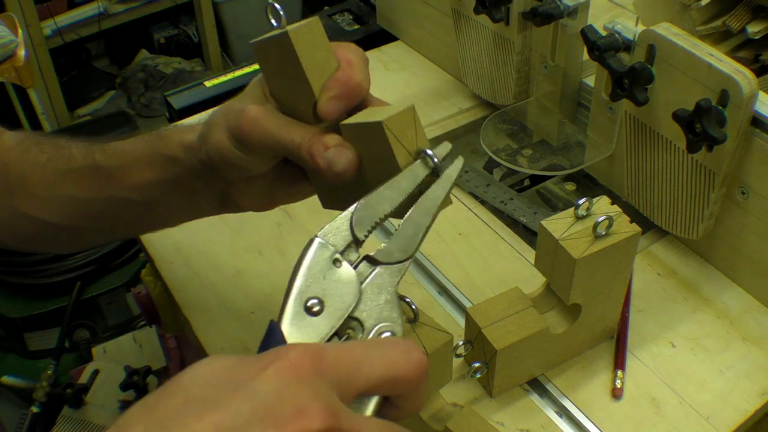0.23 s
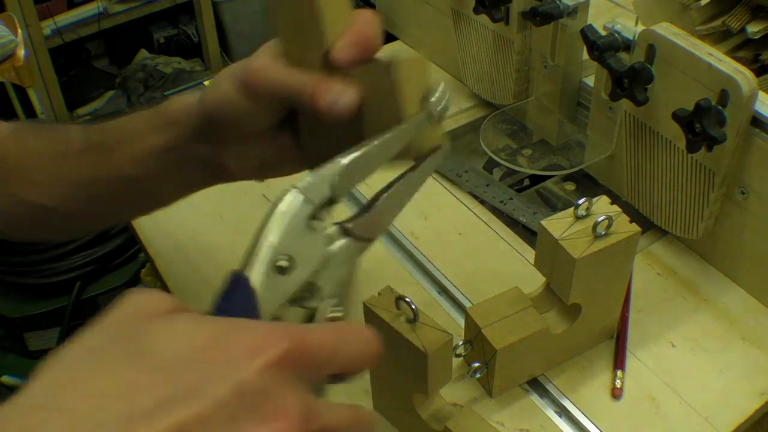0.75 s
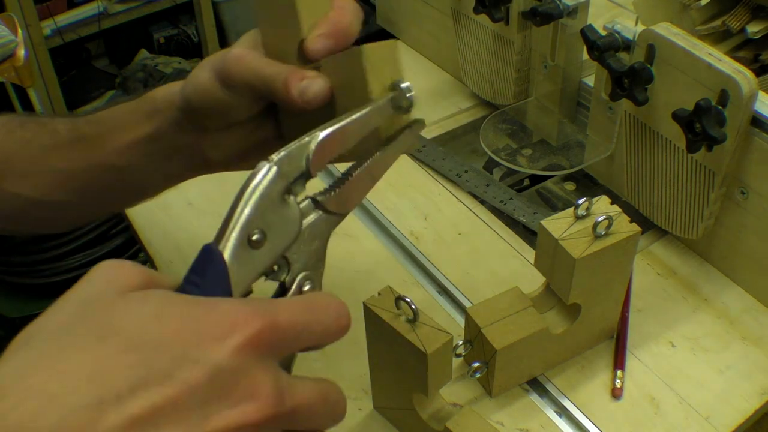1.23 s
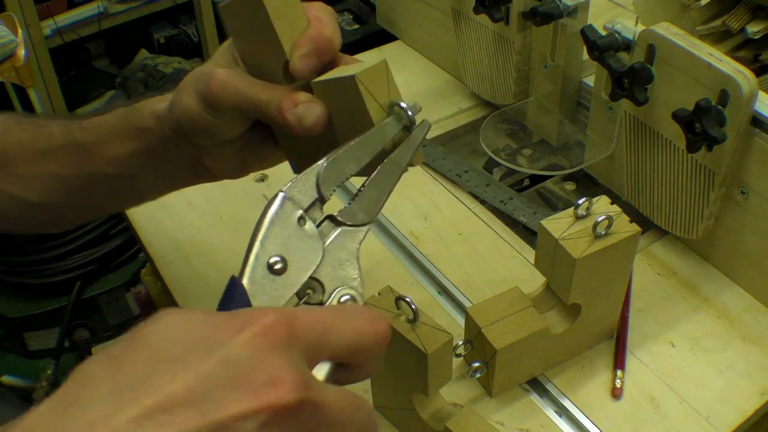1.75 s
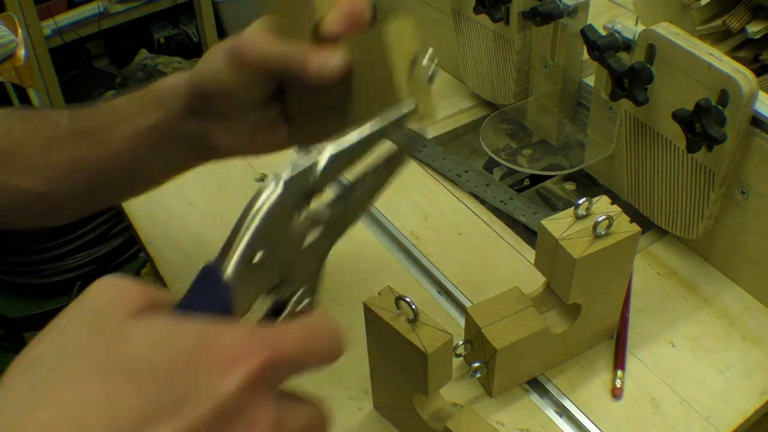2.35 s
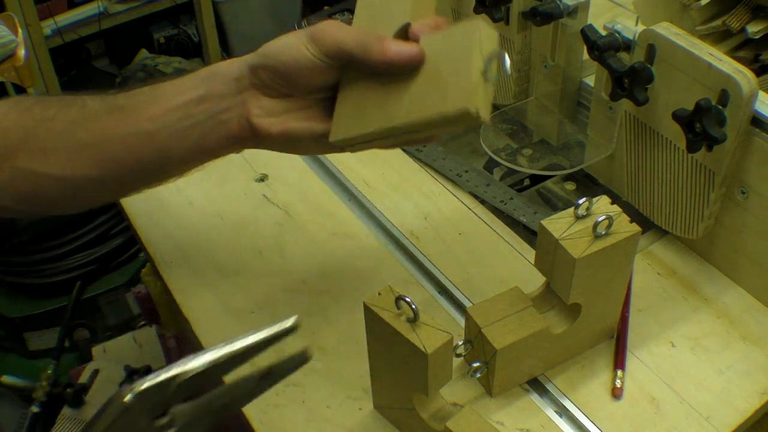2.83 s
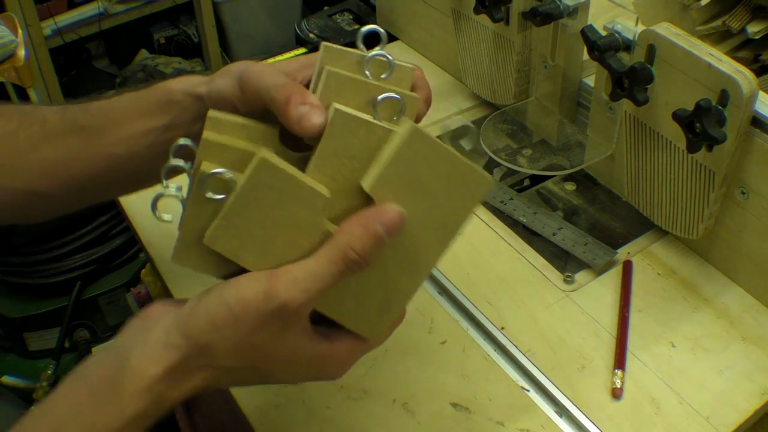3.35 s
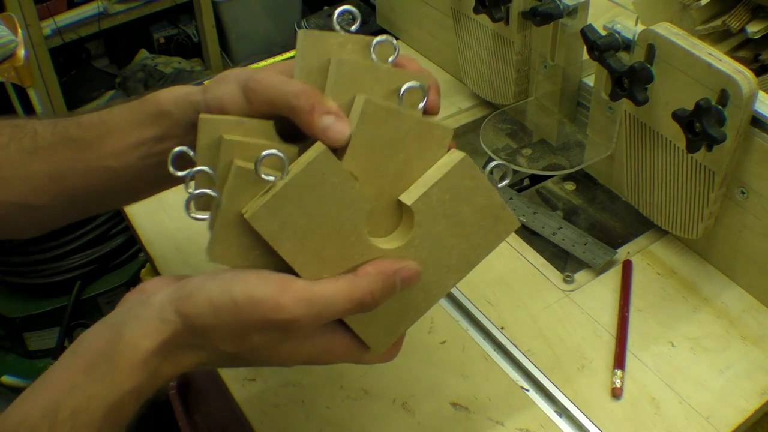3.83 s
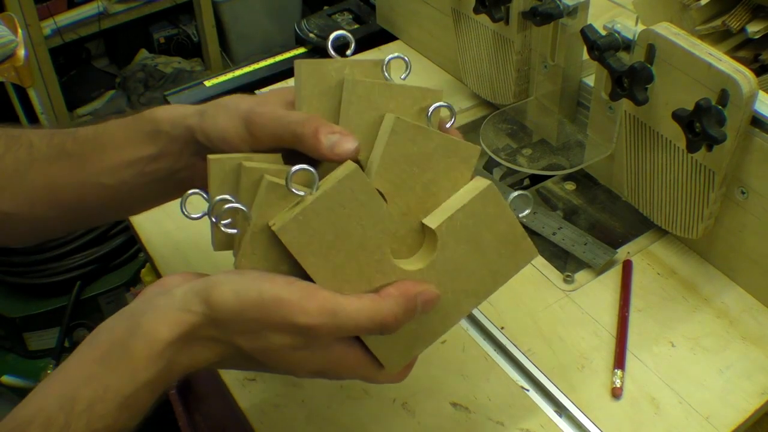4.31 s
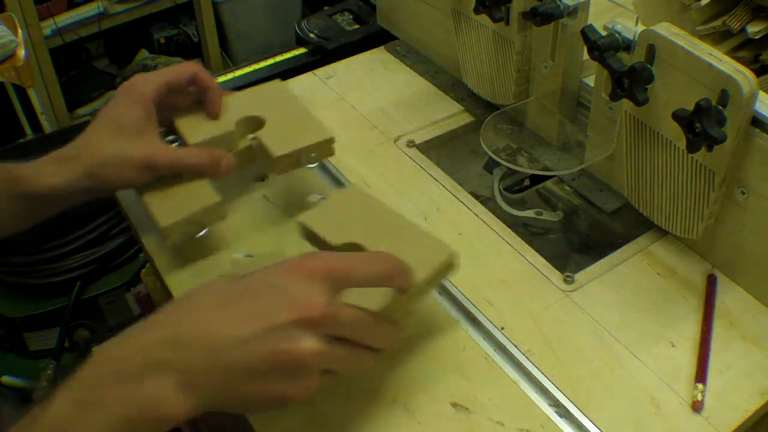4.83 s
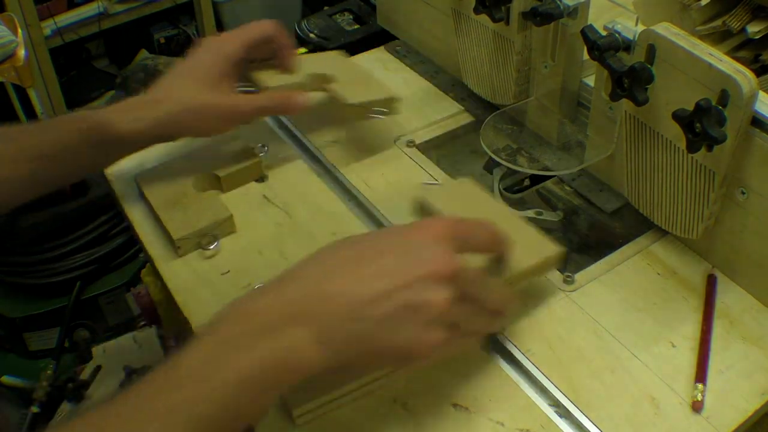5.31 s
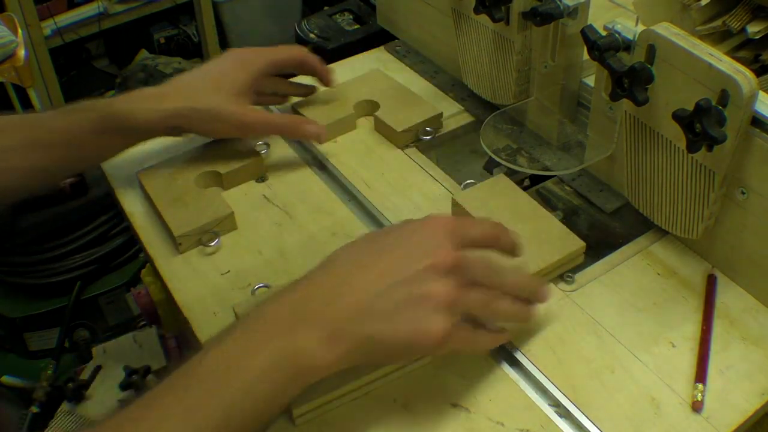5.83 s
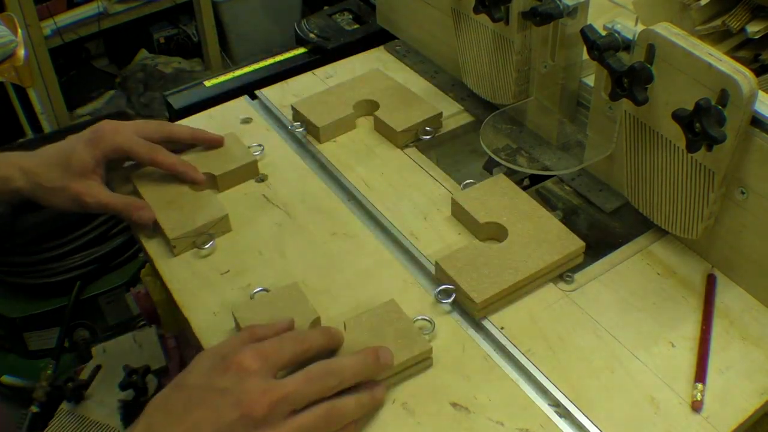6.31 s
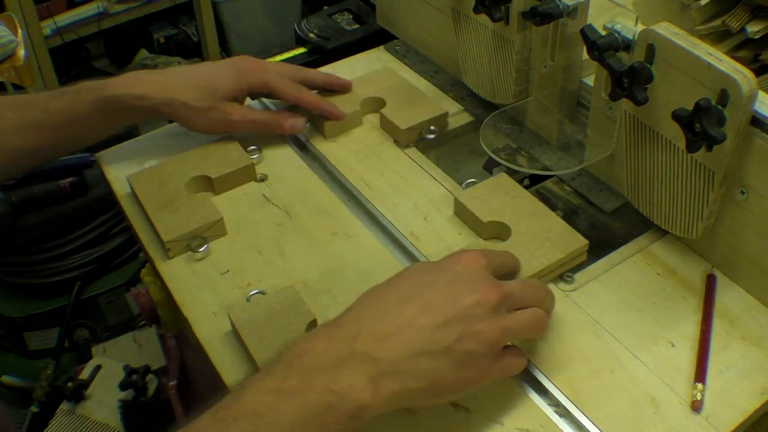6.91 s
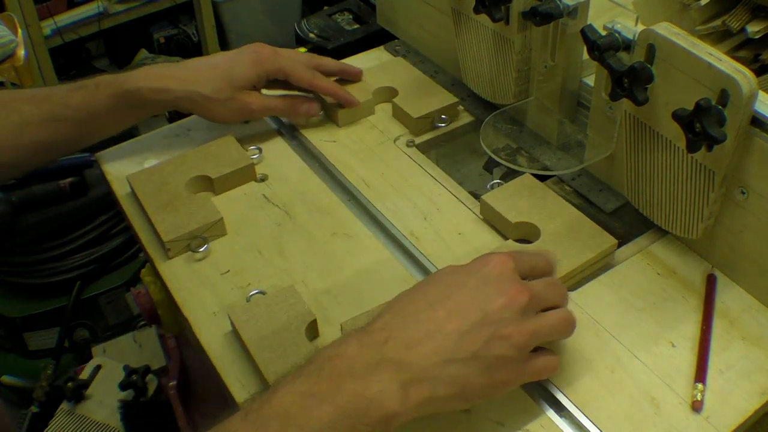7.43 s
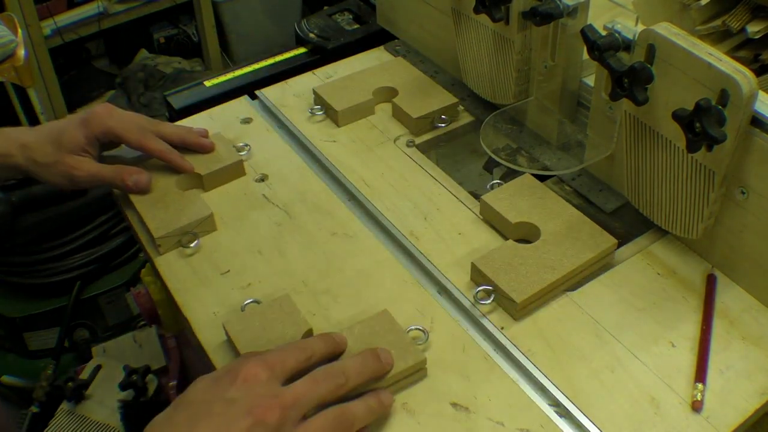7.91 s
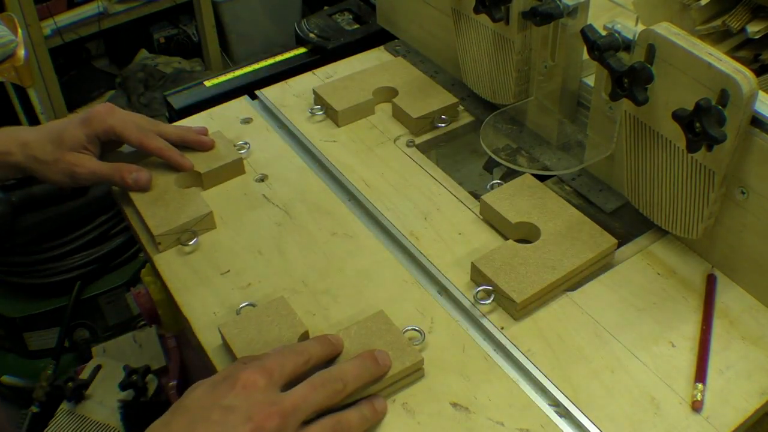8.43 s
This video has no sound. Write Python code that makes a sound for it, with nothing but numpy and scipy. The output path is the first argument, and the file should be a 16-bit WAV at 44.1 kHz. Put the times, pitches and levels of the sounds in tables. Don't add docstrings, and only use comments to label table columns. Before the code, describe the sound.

Three short groups of metallic clicks and scrapes come from steel jaws slipping on a screw eye. After a pause, fibreboard faces shuffle drily in the hands. A stack clatters very loudly onto a wooden table in two bursts, the last crack sharpest and ringing the hollow frame. Gentle pushes and fingertip nudges follow. Close microphone, dry room, low background hum.

```python
import sys
import numpy as np
from scipy import signal
from scipy.fft import rfft, irfft, next_fast_len
from scipy.io import wavfile
from scipy.ndimage import uniform_filter1d

SR = 44100
rng = np.random.default_rng(int(sys.argv[2]) if len(sys.argv) > 2 else 0)


def inscribe(sig):
    pcm = np.round(np.clip(np.atleast_2d(sig).T, -1, 1) * 32767)
    wavfile.write(sys.argv[1], SR, pcm.astype(np.int16))


def convert_level_to_amplitude(level_db):
    exponent = np.asarray(level_db, float) / 20
    return 10 ** exponent


N = 382126

# frequency in Hz, density in dB per Hz.
AIR_COLOUR = [(12, -53.5), (20, -27), (55, -4), (123, -8.5), (204, -7.5), (228, -16), (293, -20),
              (399, -7.5), (759, -24), (1860, -27.5), (2140, -27), (3070, -28), (3630, -29), (16000, -37.5)]
# frequency in Hz, level in dB rms.
HUM_LINES = [(100, -76), (200, -71), (300, -77), (400, -77.5), (2200, -84), (11100, -94)]
# frequency in Hz, density in dB per Hz.
PREAMP_COLOUR = [(18, -49.5), (30, -22), (157, -9), (252, -12.5), (384, -5), (1010, -12), (2170, -13),
                 (13700, -15.5), (16000, -22)]
# frequency in Hz, T60 in seconds.
ROOM_T60 = [(200, 0.31), (800, 0.18), (3000, 0.22), (7000, 0.03), (14000, 0.047)]

# time in seconds, peak in dB, seat of the held block (how well it is
# driven) in dB, top modes in dB relative.
PLIER_BITES = [(0.5671, -36, -26, -16), (0.64, -49.5, -22, -4), (0.6942, -36.5, -12, -2),
               (0.7154, -34, -8.5, -2), (0.7884, -32.5, -23, 1), (1.2113, -28, -3.5, 12),
               (1.2154, -39, -3, 6.5), (1.2531, -18, -39, -5.5), (1.2584, -22.5, -24, -18),
               (1.3039, -35, 2, -6), (1.3208, -15, -11, 6), (1.3281, -30, -28, 8), (1.3314, -19, -30, 5),
               (1.3424, -34, -14.5, -4), (1.3574, -29.5, -28.5, 5), (1.4042, -33, -23, -1),
               (1.4628, -44, -20.5, 1), (2.161, -52, -4.5, -20.5), (2.2089, -49.5, -15, -11),
               (2.3044, -42, -2, 10), (2.3136, -27, -1, 5), (2.3174, -18.5, -56, -19),
               (2.3274, -25, -18, 5), (2.3324, -19.5, -29, -4), (2.3524, -43, -23, -6),
               (2.3614, -36.5, -36, 3), (2.3754, -43, -32, -10), (2.3874, -37.5, -37, 0),
               (2.4104, -41, -15.5, 2.5), (2.5411, -42.5, -36.5, -14)]
# time in seconds, peak in dB.
TOOTH_SKIPS = [
    (.7228, -27),
    (.7324, -33),
    (.7398, -22),
    (.7474, -27),
    (.7565, -25),
    (.764, -18),
    (.7724, -18),
    (.7796, -26),
]
# hardest moment in seconds, level in dB, rise in seconds over 20 dB,
# fall in seconds over 20 dB, brightness in dB.
JAW_GRINDS = [
    (.83, -58, .1, .13, -14),
    (.752, -37.5, .05, .07, -2),
    (1.215, -48, .02, .05, 5),
    (1.27, -45, .03, .05, -13),
    (1.306, -40, .012, .045, 4),
    (1.37, -57, .05, .07, 9),
    (2.19, -71, .1, .4, -5),
    (2.32, -41, .03, .04, 3),
    (2.37, -56, .05, .08, 3),
]
# frequency in Hz, level in dB, T60 in seconds.
LOW_JAW_MODES = [(1567, -15, 0.02), (1860, -2.5, 0.0082), (2227, 1, 0.025), (2395, -2, 0.017)]
# frequency in Hz, level in dB, T60 in seconds.
JAW_MODES = [(2950, -12, 0.013), (2860, 5.5, 0.014), (3362, 13.5, 0.017), (3770, -9.5, 0.0048),
             (4400, 1, .007)]
# frequency in Hz, level in dB, T60 in seconds.
TOP_JAW_MODES = [(5050, 1, 0.015), (5320, 0, 0.0086), (6100, -6.5, 0.0062), (6830, -1, 0.0051),
                 (7775, -5, 0.0048), (8056, -3.5, 0.012), (9300, -0.5, 0.003), (10340, -9, 0.0051),
                 (11800, -13.5, 0.0038), (12100, -19.5, .003), (13900, -11, .004), (15000, -11, 0.0033)]
# frequency in Hz, level in dB, T60 in seconds.
HELD_BLOCK_MODES = [(109.5, -22, .025), (444, -1, 0.037), (635, -1.5, 0.045), (790, -1, 0.012),
                    (994, -1.5, 0.019)]
# frequency in Hz, density in dB per Hz.
GRIND_SPECTRUM = [(590, -62.5), (1000, -21.5), (1340, -27), (1520, -2), (1810, -13), (3420, -3),
                  (3840, -12), (8260, -18), (16000, -29)]
# time in seconds, frequency in Hz, peak in dB, T60 in seconds.
FREE_PINGS = [(.568, 5200, -45, .03), (.698, 1560, -37, .07), (.773, 2200, -26, .05),
              (1.212, 3420, -36, .08), (1.322, 13780, -44, .22), (.7225, 4900, -34, .03),
              (.7565, 3450, -28, .05), (2.306, 13800, -50, .05), (2.315, 2190, -29, .08),
              (2.329, 3400, -33, .08), (2.389, 4958, -49, .17), (.74, 5150, -32, .02),
              (.7645, 5000, -27, .02), (.7728, 4900, -28, .025), (.81, 3400, -43, .05),
              (.828, 3150, -45, .04), (.86, 3250, -51, .05), (.745, 1620, -33, .04), (.757, 2250, -31, .03),
              (.80, 1600, -45, .1), (2.305, 4950, -44, .03), (2.35, 3350, -45, .1), (2.41, 3050, -50, .14)]
# time in seconds,
# frequency in Hz, peak in dB, T60 in seconds.
CLICK_RINGS = [(.7395, 4300, -32, .02), (.7395, 700, -36, .03), (.7645, 4200, -26, .015),
               (.7645, 600, -33, .03), (.7728, 4250, -27, .02), (.7728, 600, -35, .03),
               (.788, 5700, -34, .015), (1.2113, 13900, -34, .01), (1.2155, 13900, -38, .01),
               (1.253, 6200, -30, .01), (1.3208, 13800, -24, .012), (1.3295, 8300, -26, .015),
               (1.3295, 10800, -30, .012), (1.3295, 6800, -28, .015), (1.823, 2200, -52, .03),
               (2.306, 4950, -38, .03), (2.3145, 7000, -33, .02), (2.3145, 5000, -33, .02),
               (2.3275, 7000, -33, .015), (2.352, 7800, -44, .012), (2.387, 10000, -46, .01),
               (2.592, 2250, -54, .05), (2.592, 700, -45, .07), (1.212, 700, -38, .04)]

HAND_RUBS = [(2.986, -46, 0.0073, 0.031, -17), (3.08, -51.5, 0.046, 0.018, -7),
             (3.165, -38.5, 0.069, 0.087, -12), (3.352, -48.5, 0.047, 0.17, -3.5),
             (3.512, -44.5, 0.056, 0.023, -3), (3.26, -42, .03, 0.0076, -4.5),
             (3.58, -53, 0.034, 0.22, -1.8), (3.77, -50.5, 0.041, 0.09, 3), (3.86, -47.5, .02, .075, -6),
             (4.0, -65, 0.054, 0.18, -16), (4.16, -56, 0.036, 0.15, -4), (4.68, -66.5, 0.051, 0.051, 8.5)]
STACK_SKIDS = [
    (5.01, -39.5, 0.016, 0.024, -11.5),
    (5.11, -57.5, 0.18, 0.0092, -5),
    (5.465, -53.5, 0.042, 0.061, -9),
    (5.59, -42, 0.028, 0.033, 2.5),
    (5.64, -52, .01, 0.1, -16),
]
BLOCK_ROCKS = [
    (5.036, -42, 0.028, 0.11, -17.5),
    (4.988, -53, 0.0058, 0.026, 8),
    (5.465, -45, .012, 0.05, -10),
    (5.598, -39.5, 0.063, 0.015, 5),
    (5.615, -20, 0.0015, 0.0028, -0.5),
    (5.625, -26.5, .002, 0.028, -2.5),
    (5.657, -25.5, .01, 0.14, -31),
    (5.803, -57.5, 0.012, 0.21, -16),
]
TABLE_SLIDES = [
    (6.114, -58.5, 0.15, 0.095, -4.5),
    (6.302, -50.5, 0.074, 0.074, 1.5),
    (6.385, -49.5, 0.022, 0.045, -2),
    (6.846, -47, 0.045, 0.028, -6.5),
    (6.938, -44.5, 0.11, 0.072, -5.5),
    (7.0, -48, .02, 0.19, 6.5),
    (7.204, -48.5, 0.019, 0.135, -3),
    (7.32, -55.5, 0.018, 0.19, -19.5),
    (7.85, -42, 0.046, 0.081, -4.5),
    (7.925, -42, .02, 0.1, -25.5),
]
FINGER_NUDGES = [
    (0.0, -58.5, .01, 0.046, -20),
    (8.11, -56.5, 0.09, 0.0067, -4),
    (8.21, -56.5, 0.033, 0.014, -6),
    (8.285, -57.5, 0.057, 0.039, 0),
    (8.352, -52.5, 0.031, 0.055, -11.5),
    (8.505, -50.5, .04, 0.0098, -7.5),
    (8.56, -51, 0.032, 0.017, -8),
    (8.615, -39.5, 0.036, 0.028, -11.5),
]
# frequency in Hz, density in dB per Hz.
FACE_SPECTRUM = [(180, -45), (300, -32), (348, -23.5), (624, -20.5), (1190, -19.5), (1750, -8.5),
                 (2280, -8.5), (2520, -18.5), (3000, -12), (3320, 0), (3800, -12), (4520, -21), (5430, -13),
                 (7690, -17), (8360, -17), (13800, -21.5), (16000, -23.5)]
# frequency in Hz, density in dB per Hz.
TABLE_SPECTRUM = [(29, -55), (50, -21), (155, -23.5), (200, -12), (270, -16), (367, -8.5), (405, -2),
                  (540, -7.5), (669, -17.5), (717, -16.5), (1400, -26.5), (1820, -53.5), (3080, -120)]
# frequency in Hz, density in dB per Hz.
SURFACE_SPECTRUM = [(710, -26), (1200, -13), (1520, -3.5), (1850, -11.5), (2200, -4), (2530, -11.5),
                    (3250, -2), (4040, -15.5), (10000, -23), (16000, -31)]

# time in seconds, peak in dB, low modes in dB relative, sharpness in dB
# relative, contact in milliseconds.
BLOCK_KNOCKS = [(.001, -41, -22, -24, 0.72), (0.9595, -46, -8, -22.5, 1.3), (1.737, -48.5, 10.5, -15, .4),
                (1.823, -41, 8, -13.5, .25), (2.271, -47, 14, -12, .4), (2.592, -36.5, -8, -14, 0.67),
                (3.11, -31, 5.5, -18, 0.45), (5.005, -8, -1.5, -15, 0.56), (5.009, -14, 4.5, -23.5, 0.81),
                (5.013, -3.5, -4, -15, 0.39), (5.0165, -13.5, -5.5, -18.5, 0.37),
                (5.021, -8.5, -9.5, -15.5, 0.53), (5.023, -11, -7.5, -14, 0.22),
                (5.026, 0, -6.5, -21.5, 0.89), (5.031, -9.5, -9.5, -10.5, .35),
                (5.037, -17.5, -0.5, -14, .6), (5.046, -22.5, 3, -22.5, 0.87),
                (5.065, -22.5, 0.5, -23.5, .6), (5.434, -8.5, 4.5, -25.5, 0.84),
                (5.4604, -4.5, -5, -22, .75), (5.482, -13, 2, -21.5, 0.64), (5.491, -11, 0, -20.5, .9),
                (5.499, -16, 10.5, -24.5, 0.72), (5.5581, -8.5, -3.5, -25, 0.59),
                (5.5626, -9.5, -0.5, -29, 0.44), (5.6083, 0, -2, 2, 0.34), (5.611, -4, -4.5, -9, 0.29),
                (5.649, -7.5, -10, -5, 0.45), (5.663, -11, -9, -10, 0.43), (5.673, -14.5, -14, -23, .5),
                (5.954, -39, -1, -23, 0.54), (7.84, -53, 18, -16, .6), (8.112, -48.5, 15, -19, .7),
                (8.347, -52, 8, -20, 0.64), (8.556, -50, -1, -15, 0.62), (8.612, -38, 14, -12.5, 0.75),
                (3.44, -47, 3, -20, .8), (4.72, -59.5, 2, -10.5, 0.7)]
# time in seconds, peak in dB.
CORNER_CRACKS = [
    (1.823, -55),
    (2.592, -56.5),
    (5.013, -38),
    (5.031, -27.5),
    (5.434, -44.5),
    (5.46, -33),
    (5.558, -34),
    (5.609, -7.5),
    (5.6108, -15),
    (5.65, -37.5),
]
# time in seconds, peak in dB, contact in milliseconds.
FRAME_BLOWS = [
    (5.026, -40, 1.0),
    (5.46, -36, 1.0),
    (5.61, -20, 1.0),
]
# frequency in Hz, level in dB, T60 in seconds.
LOW_BOARD_MODES = [(200, -21, 0.049), (260, -10.5, 0.051), (400, -11, 0.037), (500, 3, 0.043),
                   (570, -13, 0.028), (660, -9, 0.076)]
# frequency in Hz, level in dB, T60 in seconds.
MID_BOARD_MODES = [(754, -5.5, 0.013), (843, 4, 0.015), (949, -7, 0.04), (1056, -8.5, 0.027),
                   (1265, -6.5, 0.023), (1420, -18.5, 0.016), (1450, -6.5, 0.026), (1700, -11.5, 0.019),
                   (1931, -2, 0.0075), (2040, -7, 0.02)]
# frequency in Hz, level in dB, T60 in seconds.
EDGE_MODES = [(2520, -12.5, 0.0043), (2900, -2, 0.0078), (3200, 7, 0.009), (3490, -8, 0.015),
              (3624, -5.5, 0.0067), (4200, -4, 0.006)]
# frequency in Hz, level in dB, T60 in seconds.
TOP_BOARD_MODES = [(4830, -11.5, .008), (5460, -5, 0.0031), (6230, 5.5, 0.0099), (7604, -8, 0.005),
                   (8800, -4.5, 0.0037), (9300, -11, 0.0028), (11100, -6.5, 0.0023), (12100, -1, 0.003),
                   (14300, -15.5, .002)]
# frequency in Hz, level in dB, T60 in seconds.
FRAME_MODES = [(91.5, -11, 1.3), (125, 2, .2), (221, -6, 1.1), (258, -19, 1.0), (296, -24, 1.2),
               (398, 0, 1.3), (452, 12, 0.45), (506, -17, .9), (571, -28, 1.2)]
# time in seconds, frequency in Hz,
# peak in dB, T60 in seconds.
LANDING_RINGS = [(5.013, 92, -33.5, .14), (5.013, 135, -32, .1), (5.013, 1010, -17, .05),
                 (5.013, 1320, -21, .05), (5.017, 1780, -22.5, .04), (5.022, 2200, -21.5, .03),
                 (5.026, 1520, -23.5, .05), (5.032, 900, -20.5, .12), (5.032, 2050, -26.5, .04),
                 (5.05, 400, -27.5, .3), (5.078, 880, -33, .15), (5.434, 1570, -26.5, .04),
                 (5.434, 485, -13, .06), (5.434, 1050, -24, .03), (5.46, 1314, -27.5, .04),
                 (5.46, 780, -14, .03), (5.497, 500, -17, .04), (5.46, 190, -30, .25),
                 (5.558, 1319, -13, .028), (5.558, 894, -18, .05), (5.024, 545, -12, .035),
                 (5.031, 2650, -22, .02), (5.03, 4300, -30, .02), (5.482, 820, -20, .025),
                 (5.62, 3600, -26, .15), (5.65, 1240, -18, .03), (5.558, 1090, -24, .04),
                 (5.609, 2121, -11, .025), (5.609, 1631, -15, .07), (5.609, 1240, -20, .04),
                 (5.609, 985, -18, .1), (5.612, 436, -17.5, .12), (5.65, 1244, -20.5, .05),
                 (5.65, 1940, -22, .035), (5.65, 1490, -25.5, .12), (5.672, 420, -21, .07)]


def log_hz(points, hz):
    table_hz, value = np.transpose(points)
    return np.interp(np.log(hz + 1), np.log(table_hz), value)


def rms_one(x):
    return x / np.sqrt(np.mean(x ** 2) + 1e-20)


def band(x, low_hz, high_hz):
    edges = [low_hz, min(high_hz, 20000)]
    return signal.sosfilt(signal.butter(3, edges, "band", fs=SR, output="sos"), x)


def drift(rate):
    pole = np.exp(-16 * np.pi * rate / SR)
    chance = rng.standard_normal(N // 8 + 5002)
    slow = signal.lfilter([1], [1, -2 * pole, pole * pole], chance)[5000:]
    return np.interp(np.arange(N) / 8, np.arange(len(slow)), rms_one(slow))


def friction(spectrum, grain_db, flutter_db):
    catches = rng.standard_normal(N) * convert_level_to_amplitude(grain_db * drift(870))
    size = next_fast_len(N)
    hz = np.arange(size // 2 + 1) * SR / size
    body = irfft(rfft(catches, size) * convert_level_to_amplitude(log_hz(spectrum, hz)), size)[:N]
    return rms_one(body * convert_level_to_amplitude(flutter_db * drift(18)))


def strokes(rows):
    release_s = 0.039
    out = np.zeros(N)
    for s, db, rise_s, hold_s, change_db in rows:
        knots = np.cumsum([s - 3 * rise_s, 3 * rise_s, hold_s, 3 * release_s])
        at = np.arange(max(round(knots[0] * SR), 0), min(round(knots[-1] * SR), N))
        level = np.interp(at / SR, knots, [db - 60, db, db + change_db, db + change_db - 60])
        out[at] = np.maximum(out[at], convert_level_to_amplitude(level))
    return out


def strike(times, peaks_db, modes, contact_s, spread_db, shift=0.027, length=3000):
    t = np.arange(length) / SR
    hz, level_db, t60 = np.transpose(modes)[:, :, None]
    force = t[:600] / contact_s * np.exp(-t[:600] / contact_s)
    out = np.zeros(N + length)
    for s, peak_db in zip(times, peaks_db):
        detune = 1 + shift * rng.standard_normal(hz.shape)
        free = convert_level_to_amplitude(-60 * t / t60) * np.sin(2 * np.pi * hz * detune * t)
        ragged = rng.standard_normal((len(hz), 600)) * force
        ringing = signal.fftconvolve(free, ragged, axes=1)[:, :length]
        strength = convert_level_to_amplitude(level_db + spread_db * rng.standard_normal(hz.shape))
        ringing *= strength / np.abs(ringing).max(axis=1, keepdims=True)
        blow = band(ringing.sum(axis=0), 0.56 * hz.min(), 1.2 * hz.max())
        at = round(s * SR)
        out[at:at + length] += convert_level_to_amplitude(peak_db) * blow / np.abs(blow).max()
    return out[:N]


def thud(s, peak_db, contact_ms, modes, spread_db, shift, cut_hz, length):
    t = np.arange(length) / SR
    hz, level_db, t60 = np.transpose(modes)[:, :, None]
    chance = rng.standard_normal((2, len(hz), 1))
    decay = convert_level_to_amplitude(level_db + spread_db * chance[0] - 60 * t / t60)
    free = decay * np.sin(2 * np.pi * hz * (1 + shift * chance[1]) * t)
    push = np.sin(np.pi * np.minimum(t[:200] * 1000 / contact_ms, 1)) ** 2
    blow = np.convolve(free.sum(axis=0), push)[:length]
    blow = signal.lfilter(*signal.butter(2, cut_hz, "high", fs=SR), blow)
    out = np.zeros(N + length)
    at = round(s * SR)
    out[at:at + length] = convert_level_to_amplitude(peak_db) * blow / np.abs(blow).max()
    return out[:N]


def rings(rows):
    out, t = np.zeros(N), np.arange(SR // 2) / SR
    for s, hz, peak_db, t60 in rows:
        at = round(s * SR)
        onset = np.minimum(2 * hz * t, 1)
        out[at:at + len(t)] += convert_level_to_amplitude(peak_db - 60 * t / t60) * np.sin(2 * np.pi * hz * t) * onset
    return out


def background():
    t = np.arange(N) / SR
    hum = np.zeros(N)
    for hz, db in HUM_LINES:
        level = convert_level_to_amplitude(db + 1.0 + 2.7 * drift(1.6))
        hum += level * np.sin(2 * np.pi * hz * t + 0.5 * drift(4.0))
    return convert_level_to_amplitude(-67) * friction(AIR_COLOUR, 0, 0.35) + hum


def gain_control(x, knee_db, share, release_db_s):
    ramp = release_db_s * np.arange(N) / SR
    over = share * np.maximum(20 * np.log10(np.abs(x) + 1e-9) - knee_db, 0)
    reduction_db = np.maximum.accumulate(over + ramp) - ramp
    return convert_level_to_amplitude(-uniform_filter1d(reduction_db, size=441))


def shop(x):
    t = np.arange(SR // 2) / SR
    edges = 90 * 2. ** np.arange(9).clip(0, 7.5)
    tail = 0
    for low, high in zip(edges, edges[1:]):
        octave = signal.butter(2, [low, high], "band", fs=SR, output="sos")
        noise = signal.sosfilt(octave, rng.standard_normal(len(t)))
        tail = tail + noise * convert_level_to_amplitude(-60 * t / log_hz(ROOM_T60, np.sqrt(low * high)))
    tail = tail * (1 - np.exp(-t / 0.00067))
    return signal.fftconvolve(x, tail / np.sqrt(np.sum(tail ** 2)))[:N]


def eye():
    song = rings([(1.353, 4947, -37, .3)])
    touch_s, touch_db = 1.377, -9
    return song * np.where(np.arange(N) > touch_s * SR, convert_level_to_amplitude(touch_db), 1)


def jaw_grind():
    middle = strokes([(s, db, rise, fall, -20) for s, db, rise, fall, _ in JAW_GRINDS])
    bright = strokes([(s, db + top_db, rise, 1.2 * fall, -20) for s, db, rise, fall, top_db in JAW_GRINDS])
    grind = friction(GRIND_SPECTRUM, 1.4, 2.3)
    low_part = signal.sosfilt(signal.butter(4, 4500, fs=SR, output="sos"), grind)
    high_part = signal.sosfilt(signal.butter(4, 4500, "high", fs=SR, output="sos"), grind)
    return middle * rms_one(low_part) + bright * rms_one(high_part)


def pliers():
    seat_db, seat_loss_db_s, skip_top_db = -11, 116.5, 2.5
    first_s = TOOTH_SKIPS[0][0]
    skip = [(s, db, seat_db - seat_loss_db_s * (s - first_s), skip_top_db) for s, db in TOOTH_SKIPS]
    s, peak, body, top = np.vstack([PLIER_BITES, skip]).T
    lower = 0.5 + 0.455 * body
    bites = strike(s, peak, JAW_MODES, 0.00046, 7.2, shift=0.05, length=1000)
    bites += strike(s, peak + lower, LOW_JAW_MODES, 0.00079, 5.4, length=1000)
    bites += strike(s, peak + body, HELD_BLOCK_MODES, 0.00021, 0.98, length=1500)
    bites += strike(s, peak + top, TOP_JAW_MODES, 0.00061, 3.2, length=1000)
    for at_s, hz, peak_db, t60 in FREE_PINGS:
        bites += strike([at_s], [peak_db], [(hz, 0, t60)], 0.0003, 0, shift=0, length=9000)
    return bites + jaw_grind()


def handling():
    t = np.arange(N) / SR
    rock, push, nudge = strokes(BLOCK_ROCKS), strokes(TABLE_SLIDES), strokes(FINGER_NUDGES)
    rumble = rock + push + nudge
    hiss = convert_level_to_amplitude(1.5) * rock + convert_level_to_amplitude(-7.5) * push + convert_level_to_amplitude(-13) * nudge

    faces = friction(FACE_SPECTRUM, 2.5, 1.7)
    gap_bands_hz = ((1300, 1400), (1600, 1900), (1950, 2000), (3000, 3700), (3400, 3500), (4800, 5700),
                    (6500, 9000))
    for low_hz, high_hz in gap_bands_hz:
        faces = faces + 0.41 * drift(27.0) * band(faces, low_hz, high_hz)
    skid = strokes(STACK_SKIDS) * rms_one(band(faces, 4900, 16000))

    table = friction(TABLE_SPECTRUM, 4.0, 0.68)
    soft_middle = (np.abs(t - 7.1) > .45) & (t > 6)
    table = table + soft_middle * convert_level_to_amplitude(7.5) * band(table, 86.0, 263)

    surface = friction(SURFACE_SPECTRUM, 0.53, 0.61)
    surface = np.where(t < 6, band(surface, 560, 4600), surface)
    slide = rumble * table + hiss * surface
    return strokes(HAND_RUBS) * faces + skid + slide


def knocks():
    s, peak, _, edge, _ = np.transpose(BLOCK_KNOCKS)
    out = strike(s, peak + edge, EDGE_MODES, 0.00082, 3.2, length=1000)
    out += strike(*np.transpose(CORNER_CRACKS), TOP_BOARD_MODES, 0.00037, 6.9, length=1000)
    for at_s, peak_db, low_db, _, contact_ms in BLOCK_KNOCKS:
        damping = 0.39 if at_s < 4.9 else 1
        low = np.array(LOW_BOARD_MODES) * [1, 1, damping] + [0, low_db, 0]
        modes = np.vstack([low, MID_BOARD_MODES])
        out += thud(at_s, peak_db, contact_ms, modes, spread_db=6.5, shift=0.013, cut_hz=400, length=3500)
    for hit in FRAME_BLOWS:
        out += thud(*hit, FRAME_MODES, spread_db=0, shift=0, cut_hz=29, length=50000)
    return out


def scene():
    near = pliers() + eye() + knocks() + rings([*LANDING_RINGS, *CLICK_RINGS]) + handling()
    gain = gain_control(near, knee_db=-14.5, share=0.13, release_db_s=24)
    mid = near + convert_level_to_amplitude(-13.0) * shop(near) + gain * background()
    side = convert_level_to_amplitude(-73.5) * friction(PREAMP_COLOUR, 0, 0)
    side += convert_level_to_amplitude(-32.5) * band(mid * drift(300), 330, 1600)
    side += convert_level_to_amplitude(-24.5) * band(mid * drift(300), 3000, 16000)
    return np.array([mid + side, mid - side])


def low_pass(x):
    return signal.sosfilt(signal.butter(12, 16510, fs=SR, output="sos"), x)


def record(dry):
    limited = 1.078 * np.tanh(dry / 1.094)
    top_cut = signal.cheby2(12, 70, 16500, fs=SR, output="sos")
    return low_pass(signal.sosfilt(top_cut, limited))


dry = scene()
out = record(dry)
inscribe(out)
```